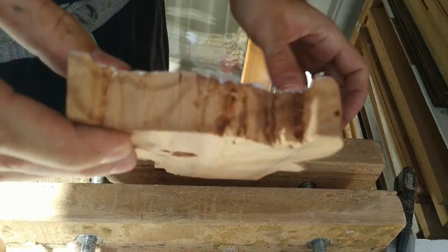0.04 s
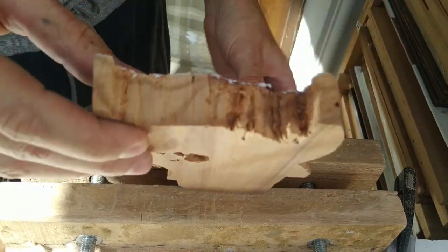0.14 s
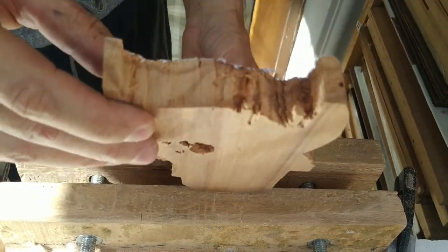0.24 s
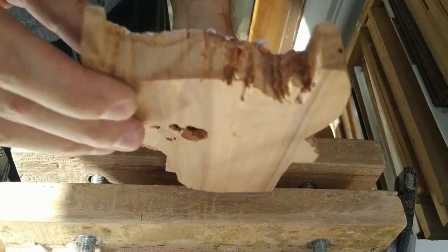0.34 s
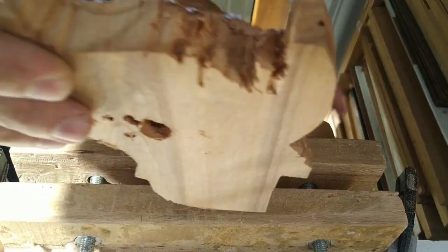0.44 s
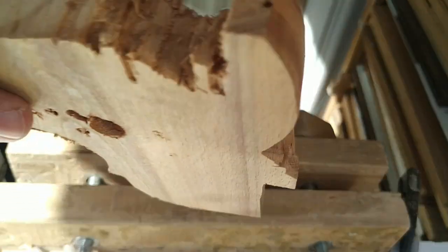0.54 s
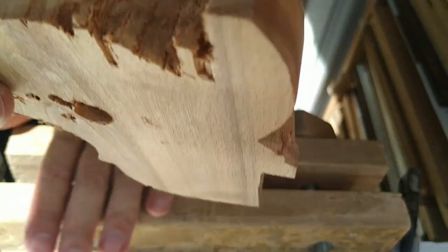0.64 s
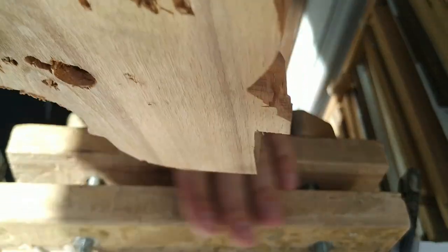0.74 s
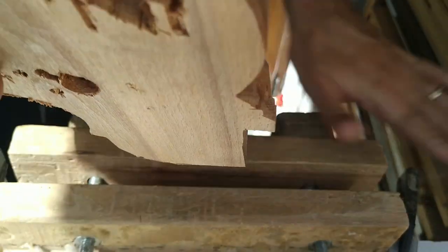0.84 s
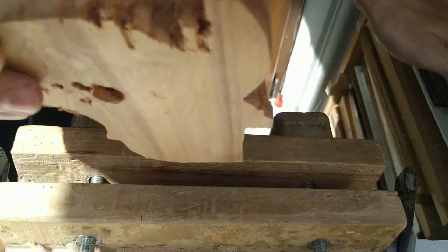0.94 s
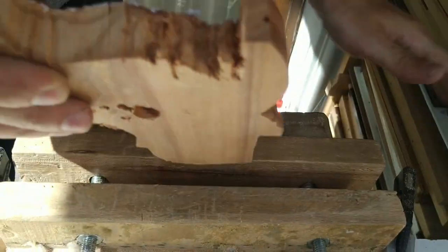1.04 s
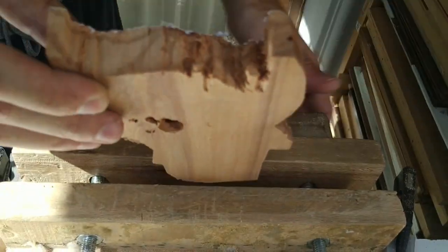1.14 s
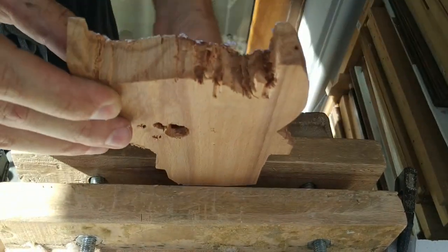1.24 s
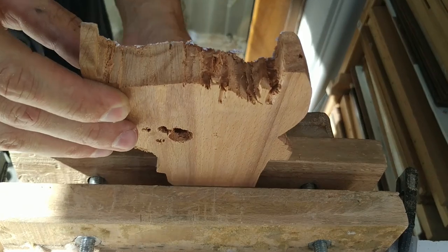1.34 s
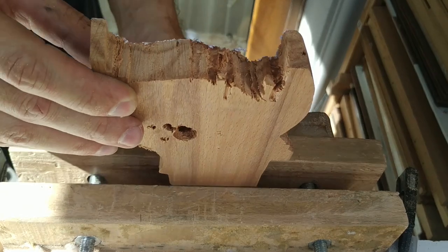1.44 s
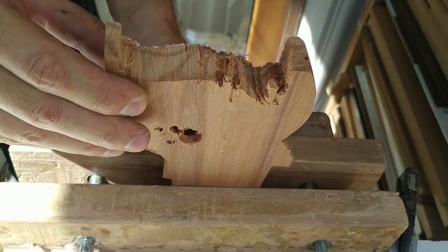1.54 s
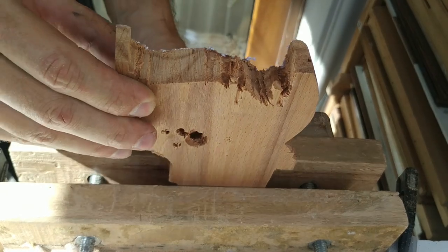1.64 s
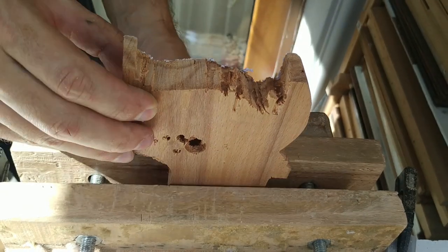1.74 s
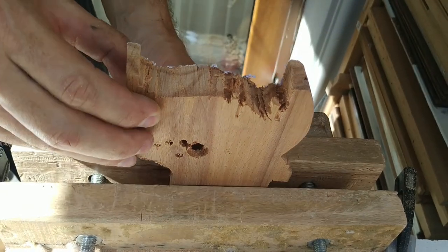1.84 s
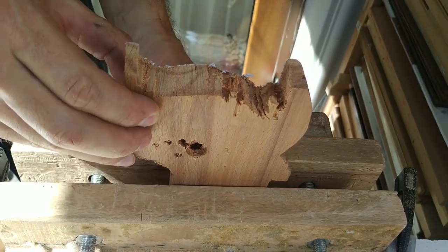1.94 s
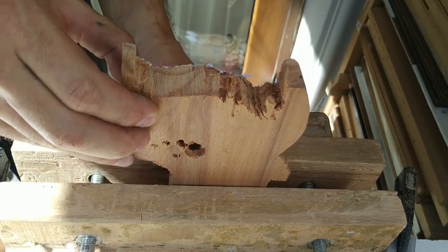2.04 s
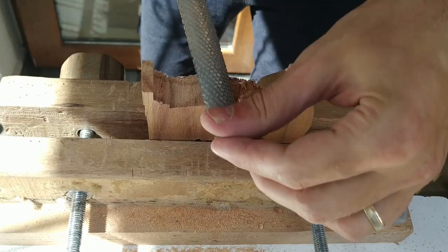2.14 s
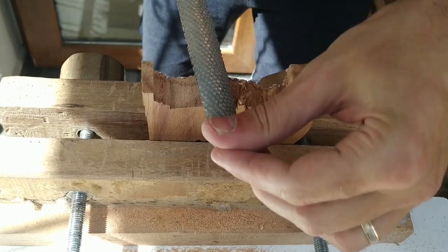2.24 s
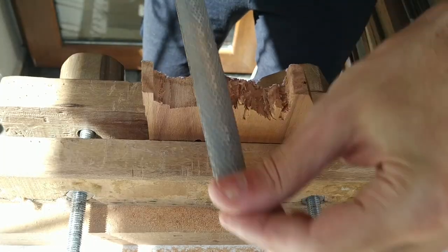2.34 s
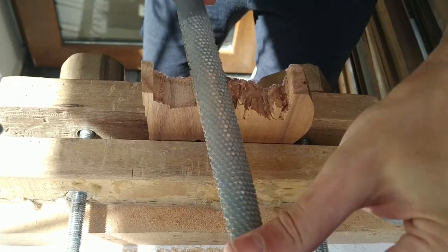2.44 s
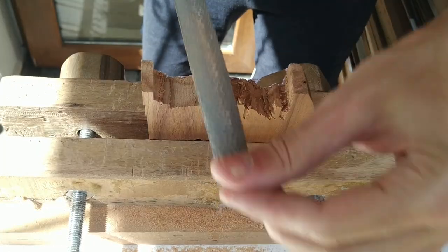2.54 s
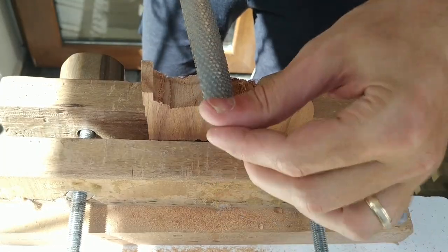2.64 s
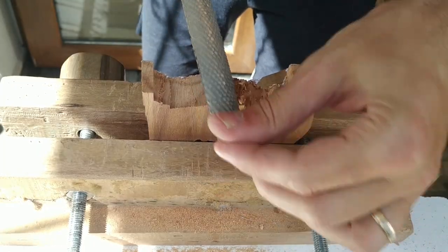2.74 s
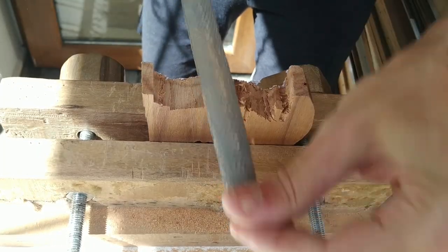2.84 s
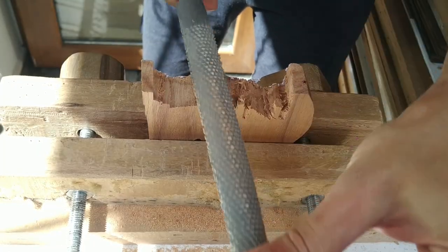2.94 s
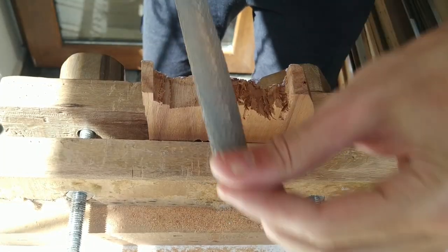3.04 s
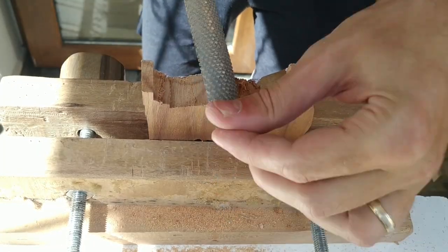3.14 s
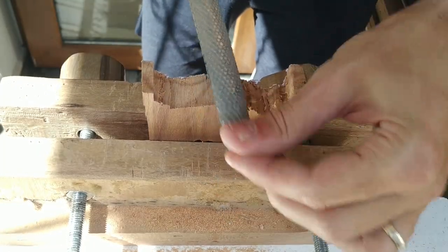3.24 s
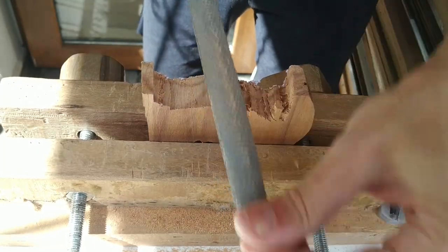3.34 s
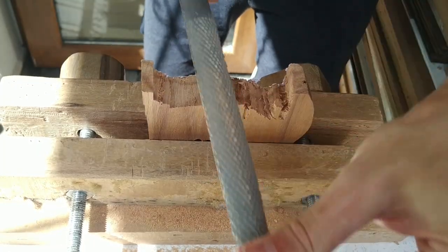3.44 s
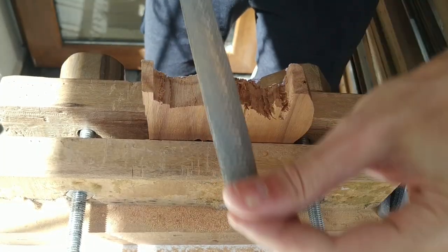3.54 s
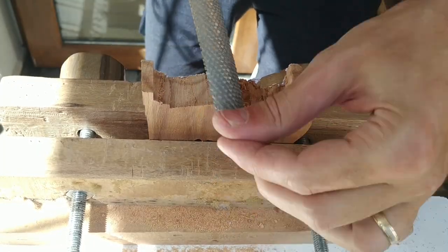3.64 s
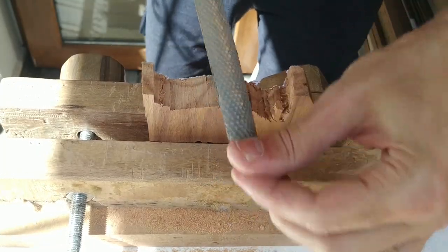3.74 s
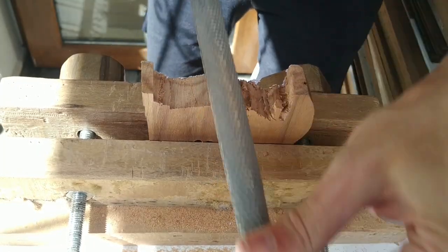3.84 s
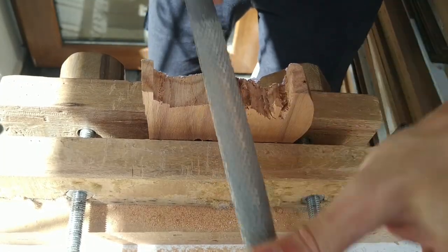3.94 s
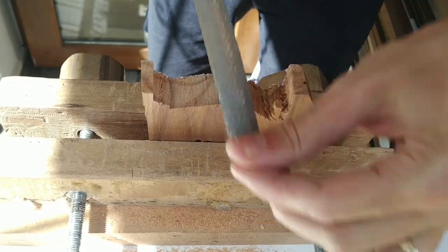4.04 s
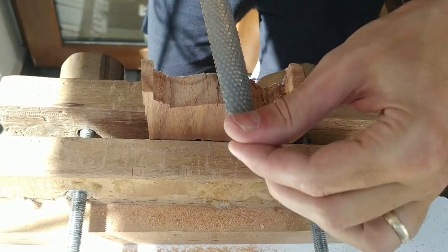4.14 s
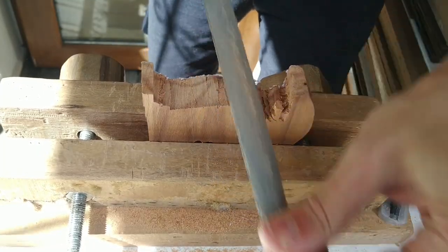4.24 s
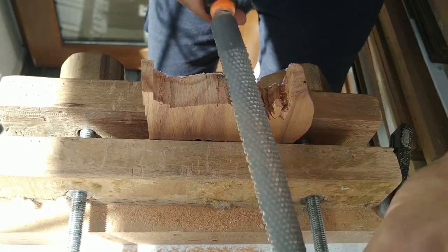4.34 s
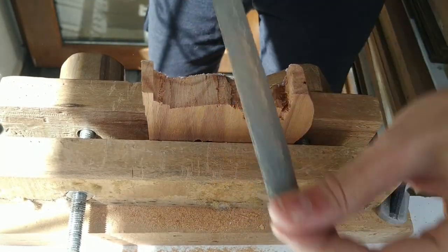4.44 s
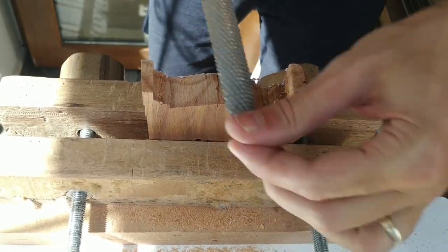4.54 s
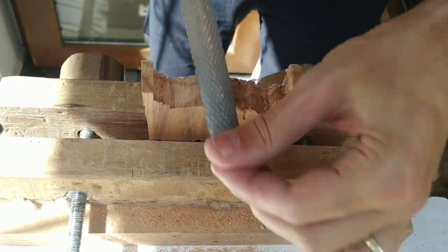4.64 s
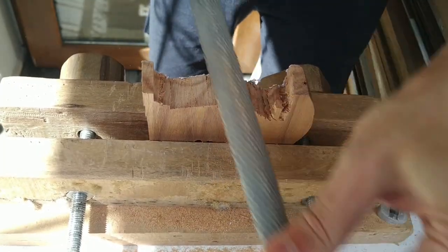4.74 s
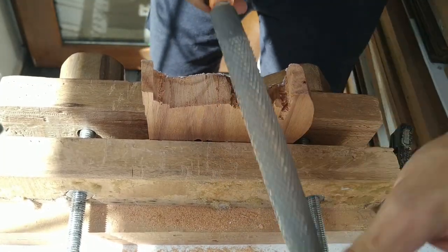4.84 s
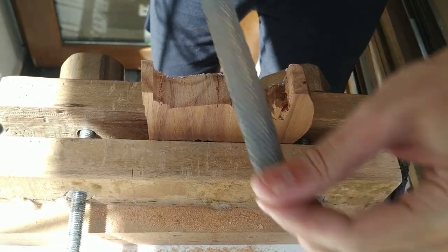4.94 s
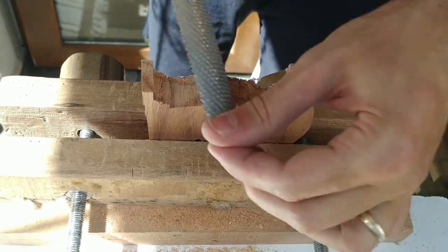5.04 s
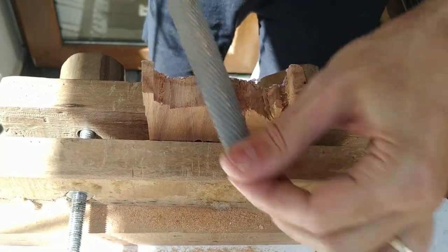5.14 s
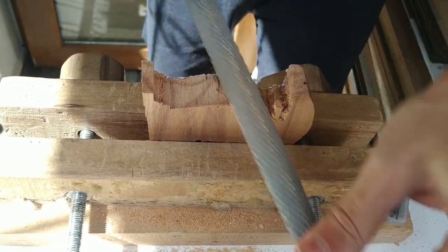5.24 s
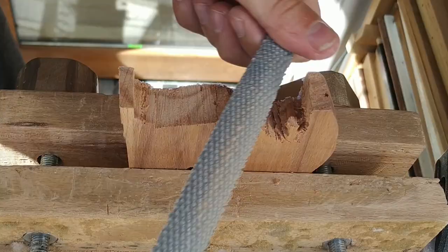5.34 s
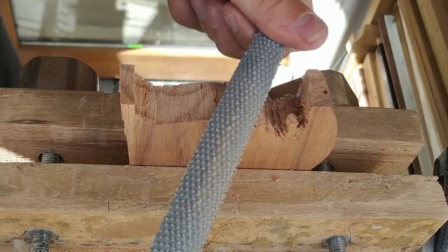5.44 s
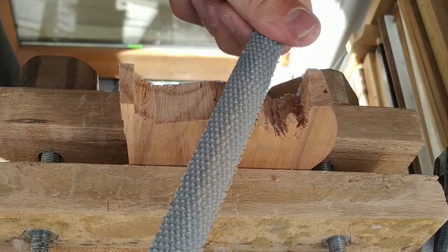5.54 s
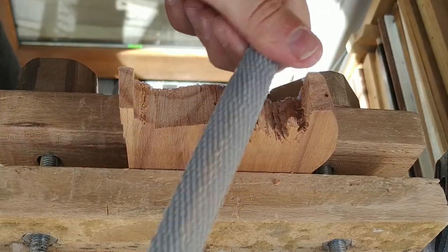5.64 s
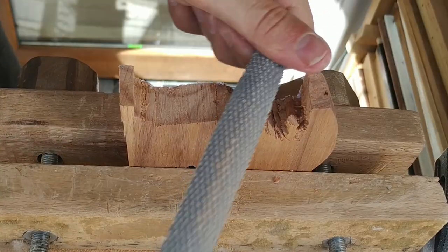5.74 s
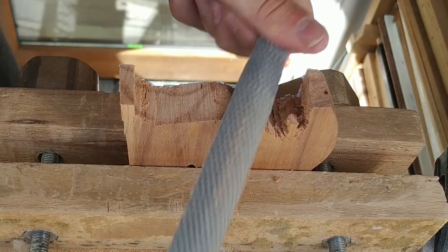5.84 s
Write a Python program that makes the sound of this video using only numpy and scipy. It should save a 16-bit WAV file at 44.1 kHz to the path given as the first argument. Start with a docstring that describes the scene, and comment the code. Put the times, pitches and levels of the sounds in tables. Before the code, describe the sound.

Soft wooden bumps and knocks as a blank is seated in a vise, then seven coarse, chattering file rasps and a few short scrapes outdoors.

```python
"""A coarse file rasps the edge of a wooden blank in a bench vise outdoors: seven pushes, then a few short scrapes.
Teeth that snag and release fibres excite resonances of wood and vise; in each push the blank chatters by stick-slip.
Ahead of each push the file slides lightly and its evenly spaced teeth hum; ringing modes die away as pushes end.
Before the filing the blank knocks, rubs and bumps into the vise and a palm sweeps over the jaw.
Short wall reflections and faint outdoor air lie behind.
"""
import sys
import numpy as np
from scipy import signal
from scipy.fft import rfft, irfft, next_fast_len
from scipy.io import wavfile
from scipy.ndimage import uniform_filter1d, minimum_filter1d, map_coordinates

SR = 44100
rng = np.random.default_rng(int(sys.argv[2]) if len(sys.argv) > 2 else 0)


def to_wav(s):
    """Save 16-bit WAV."""
    ch = np.atleast_2d(s).T  # columns
    pcm = np.round(np.clip(ch, -1, 1) * 32767)  # PCM
    wavfile.write(sys.argv[1], SR, pcm.astype(np.int16))


N = 259749

# spectral density of cut wood and of torn fibres: frequency [Hz], relative density [dB per Hz]
CUT_SPECTRUM = [(40, -20), (150, 2.5), (300, -9), (600, 1.5), (950, -1), (1400, 1), (1750, -4),
                (2200, -2.5), (2700, -0.5), (3600, -8.5), (4500, -13.5), (6000, -77)]
TEAR_SPECTRUM = [(100, -40), (600, -10), (2470, -9), (4200, -0.5), (4710, -7), (5440, -1), (5900, -6),
                 (8030, -5), (9160, -10.5), (10200, -9), (11600, -15), (12600, -13), (13700, -15),
                 (14700, -20.5), (15600, -46)]
# resonances of filed face, edge, blank, hollow low modes and vise: centre [Hz], bandwidth [Hz], relative level [dB]
FACE_MODES = [(1111, 56, -6), (1243.6, 18.6, 1), (1326, 15, 5), (1490, 76, -1.5), (1537, 23, -2),
              (1662, 84, -9.5)]
EDGE_MODES = [(1913, 117, 1), (1950, 38, 4), (2092, 102, -1.5), (2393, 22, -0.5), (2982, 28, -2.5),
              (3360, 94, -7.5), (3530, 29, -2)]
BLANK_MODES = [(637, 25.3, 0.5), (728, 18, -3), (782, 75, -13.5)]
HOLLOW_MODES = [(327, 26.6, -8), (455, 60, -9.5), (531.7, 28.6, -5.5)]
VISE_MODES = [(108.5, 17, -16.5), (131.5, 21, -3.5), (208.4, 11.3, -3), (237.6, 27.6, -11)]


def rasp():
    """Source and filter: snagging teeth are the force, and wood and vise resonances shape it."""
    rubbing, hissing = sliding(index=0), sliding(index=1)
    scrape = pressure(index=0, drop_db=29, rise_shape=2.0, fall_shape=1.9, lag_s=0.007975)
    bite = pressure(index=1, drop_db=32, rise_shape=1.95, fall_shape=2.0, lag_s=0.00099)
    tearing = pressure(index=2, drop_db=34.5, rise_shape=2.78, fall_shape=2.52, lag_s=-0.0045)
    ringing = pressure(index=3, drop_db=30.5, rise_shape=1.83, fall_shape=3.46, lag_s=-0.0049)
    hollowness = pressure(index=4, drop_db=34.5, rise_shape=1.64, fall_shape=2.4, lag_s=0.004)
    shuddering = pressure(index=5, drop_db=18.5, rise_shape=3.05, fall_shape=3.5, lag_s=-0.004)
    whine = pressure(index=3, drop_db=31.5, rise_shape=2.1, fall_shape=2.4, lag_s=0.0079)

    scrape_db = decibels(scrape + amp(-1) * rubbing)
    bite_db = decibels(bite + amp(-1) * rubbing)
    tear_db = decibels(tearing + hissing)
    ring_db = decibels(ringing + amp(-1) * rubbing)
    hollow_db = decibels(hollowness + amp(-1) * rubbing)
    shudder_db = decibels(shuddering + amp(4) * rubbing + jolts(width_s=0.022))
    whine_db = decibels(whine)
    cut_db = (scrape_db + bite_db) / 2

    swing, grip, lock = chatter(waver_hz=3.8, flutter_db=0.0, grip_depth=0.16)
    unevenness = amp(1.03 * wobble(130) + 1.17 * wobble(35))  # rows of teeth bite unevenly
    rows = unevenness * teeth(cut_db, top_rate_hz=590, depth=0.49)
    force = grip * rows * catches(rate_hz=1300, spread_db=-0.5, life_s=0.00041, bed=0.96)

    def fibres():
        return force * rng.standard_normal(N)

    cut = amp(cut_db + 0.5) * coloured(dense_modes(fibres(), t60_s=0.052), CUT_SPECTRUM)
    tear = amp(tear_db + 4.0) * coloured(dense_modes(fibres(), t60_s=0.044, dwell_s=0.1), TEAR_SPECTRUM)
    face = amp(scrape_db + 0.5) * rung(noise(force=force), FACE_MODES)
    edge = amp(bite_db + 0.5) * rung(noise(force=force), EDGE_MODES)
    ring = amp(ring_db - 0.5) * rung(noise(force=force), BLANK_MODES)
    hollow = amp(hollow_db - 1.5) * rung(noise(force=force), HOLLOW_MODES)
    shudder_db = shudder_db - 5 * lock  # strong chatter takes over from the vise's own modes
    shudder = amp(shudder_db - 2.5) * rung(noise(force=force), VISE_MODES)
    tones = singing([shudder_db, whine_db, scrape_db, bite_db], flutter_db=4.5)

    # the small blank radiates poorly in the deep bass, and wood damps the treble
    radiation = [(30, -3), (65, -2.5), (100, -3.0), (130, 0), (3800, -0.5), (9000, -1.5)]
    body = face + edge + ring + hollow + shudder + tones + swing
    body = filtered(body, lambda f: amp(along(radiation, f)))
    return cut + tear + body


# seven pushes, two short scrapes as the file is set down, and the start of one more push:
# start_s [s], rise_s [s], fall_s [s], then relative levels [dB]:
# scrape_db, bite_db, tear_db, ring_db, hollow_db, shudder_db
STROKES = [ (2.254, .15, 0.085, -31, -26.5, -36, -29, -34.5, -28.5),
           (2.724, .15, .12, -30, -28, -38, -22.5, -30.5, -29.5),
           (3.22, .14, .15, -30, -30, -40, -26, -24.5, -25.5),
           (3.686, 0.15, .16, -31, -30, -40, -23.5, -24.5, -24.5),
           (4.151, .13, .12, -29.5, -29, -37, -24.5, -31, -28.5),
           (4.623, .12, .14, -29.5, -27.5, -40, -24, -27.5, -26.5),
           (5.092, .13, 0.14, -30.5, -30, -38, -24.5, -27, -29),
           (5.417, 0.032, .12, -49, -42.5, -45, -49, -49, -38.5),
           (5.75, 0.052, 0.06, -46.5, -46.5, -50.5, -42.5, -45.5, -40.5),
           (5.826, 0.055, 0.087, -40, -37, -42, -43.5, -42, -34)]


def pressure(index, drop_db, rise_shape, fall_shape, lag_s):
    """Amplitude envelope: one layer's drive swells with every stroke to that stroke's level."""
    drive = 0
    for start, rise, fall, *levels in STROKES:
        movement = swell(start, rise + lag_s, fall, drop_db, rise_shape, fall_shape)
        drive = drive + amp(levels[index]) * movement
    return snags() * drive


# a row of teeth snags hard: start_s [s], leap_db [dB]
SNAGS = [(2.78, 3), (3.288, 5), (3.786, 5), (4.19, 7), (4.658, 5), (5.786, 6)]
SNAG_EASE_S = 0.02195  # time constant of the leap in dB


def snags():
    """Sudden catch and relaxation: the gain leaps at each snag, then its decibels decay exponentially."""
    start, leap_db = np.transpose(SNAGS)
    leaps = np.bincount(np.round(start * SR).astype(int), leap_db, N)
    return amp(signal.lfilter([1], [1, -np.exp(-1 / (SNAG_EASE_S * SR))], leaps))


def catches(rate_hz, spread_db, life_s, bed):
    """Random impulse train: teeth snag fibres and let go, over a bed of steady friction."""
    strength = amp(spread_db * np.clip(rng.standard_normal(N), -2, 2))
    impulses = (rng.random(N) < rate_hz / SR) * strength
    releases = signal.lfilter([1], [1, -np.exp(-1 / (life_s * SR))], impulses)
    return unit(bed + unit(releases))


def teeth(cut_db, top_rate_hz, depth):
    """Amplitude modulation: rows of teeth pass faster the harder the file is driven."""
    rate = top_rate_hz * amp((cut_db - cut_db.max()) / 4) * (1 + 0.04083 * wobble(40))
    return 1 + depth * np.cos(2 * np.pi * np.cumsum(rate) / SR)


def dense_modes(force, t60_s, dwell_s=0.09, size=2048):
    """High modal density: decaying noise answers cross-fade as contact travels, and differ between channels."""
    hop = round(dwell_s * SR)
    out = np.zeros((2, N + size))
    decay = amp(-60 * np.arange(size) / SR / t60_s)
    for centre in range(0, N + hop, hop):
        a, b = max(centre - hop, 0), min(centre + hop, N)
        share = np.cos(np.pi / 2 * (np.arange(a, b) - centre) / hop)
        answer = unit(noise(size) * decay)
        out[:, a:b + size - 1] += signal.fftconvolve((force[a:b] * share)[None], answer, axes=1)
    return out[:, :N]


# modes that lock onto the passing teeth:
# pitch_hz [Hz], waver_hz [Hz], level_db relative [dB], left_minus_right_db [dB]
LOCKED_MODES = [(134, 7.4, -2, -2), (637.5, 7.01, -3.5, -6), (1232, 14, -8, 8), (1996, 12.3, -6.5, 1.5)]


def singing(levels_db, flutter_db):
    """Mode locking: each mode holds an unsteady tone that follows its own drive."""
    out = np.zeros((2, N))
    for (hz, waver_hz, db, lean_db), level_db in zip(LOCKED_MODES, levels_db):
        phase = 2 * np.pi * np.cumsum(hz + waver_hz * wobble(50)) / SR
        tone = unit(amp(flutter_db * wobble(40)) * np.sin(phase))
        balance_db = np.array([[lean_db], [-lean_db]]) / 2
        out += amp(level_db + db + balance_db) * tone
    return out


# in each push the teeth catch, jolt the vise and set the blank chattering: start_s of the catch [s], length_s [s],
# pitch_hz [Hz], glide [Hz per s], chatter_db [dB], catch_jolt_db [dB], release_jolt_db [dB], levels relative
CHATTER = [ (2.29, .14, 180.6, -150, -27.5, -32, -31), (2.82, 0.092, 173.4, 8, -17.5, -16, -36),
           (3.318, .11, 174, -11.5, -14.5, -18, -22), (3.795, 0.11, 174.8, 15.5, -12, -23.5, -28),
           (4.228, 0.084, 172.2, 52, -24, -18, -29), (4.705, 0.1, 178.2, 2, -13.5, -30, -32),
           (5.18, 0.093, 172.5, 25.5, -13, -25.5, -32)]
CHATTER_LEAD_S, CHATTER_BUILD_S = 0.024, 0.06  # it starts just before the catch and builds
RING_DOWN_DB_PER_S = 251


def chatter(waver_hz, flutter_db, grip_depth):
    """Stick-slip at the blank's bending pitch: returns its swing, the grip on the teeth and its strength 0-1."""
    t = np.arange(N) / SR
    level, pitch = np.zeros(N), np.full(N, float(CHATTER[0][2]))
    for start, length, hz, glide, db, *_ in CHATTER:
        progress = np.clip((t - start + CHATTER_LEAD_S) / CHATTER_BUILD_S, 0, 1)
        build = np.sin(np.pi / 2 * progress) ** 2
        level += build * amp(db - RING_DOWN_DB_PER_S * np.maximum(t - start - length, 0))
        gliding = hz + glide * np.clip(t - start, 0, length)
        pitch = np.where(t > start - CHATTER_LEAD_S, gliding, pitch)
    phase = 2 * np.pi * np.cumsum(pitch + waver_hz * wobble(45)) / SR
    swing = np.sqrt(2) * level * amp(flutter_db * wobble(50)) * np.sin(phase)
    lock = level / level.max()
    grip = 1 + grip_depth * np.sqrt(lock) * np.cos(phase)
    return swing, grip, lock


def jolts(width_s):
    """Impulsive excitation: the vise jerks as the teeth catch and again as they let go."""
    t = np.arange(N) / SR

    def jerk(moment):
        return np.exp(-((t - moment) / width_s) ** 2)

    drive = 0
    for start, length, *_, catch_db, release_db in CHATTER:
        drive = drive + amp(catch_db) * jerk(start) + amp(release_db) * jerk(start + length)
    return drive


# the file slides lightly ahead of each push: start_s [s], end_s [s], rub_db [dB], hiss_db [dB],
# pitch_hz of the passing teeth [Hz], hum_db [dB], overtone slope [dB per octave], levels relative
SLIDES = [(2.15, 2.313, -56, -59, 130, -43.5, -13.5), (2.47, 2.771, -56, -60.5, 97.7, -43, -12.5),
          (2.959, 3.25, -51, -51, 246.4, -51, -5), (3.484, 3.719, -60, -66, 99, -53.5, -6.5),
          (3.977, 4.179, -61, -62, 183, -50.5, -15), (4.385, 4.639, -60, -64, 102, -75, -8),
          (4.867, 5.109, -64, -74, 102, -64, -6)]


def returns(waver, count=6):
    """Periodic excitation: sliding without pressure, evenly spaced teeth hum as a harmonic series."""
    hum = np.zeros(N)
    travel = np.cumsum(1 + waver * wobble(24.86)) / SR
    for start, end, *_, pitch_hz, db, overtone_db in SLIDES:
        touch = held(start, end, fade_s=0.027)
        on = touch > 0
        tone = 0
        for k in range(1, count + 1):
            tone = tone + amp(overtone_db * np.log2(k)) * np.sin(2 * np.pi * k * pitch_hz * travel[on])
        hum[on] += touch[on] * amp(db) * tone
    return np.sqrt(2) * hum * amp(1.9 * wobble(40))


def sliding(index):
    """Steady friction: faint, even drive of the rubbing or the hiss while the file slides."""
    return sum(amp(levels[index]) * held(start, end, fade_s=0.02007) for start, end, *levels in SLIDES)


# file and blank ring on as a push ends, at pitches set by the grip:
# start_s [s], pitch_hz [Hz], level_db relative [dB], t60_s [s]
RINGING = [(3.4, 543, -43, 0.45), (3.399, 1563, -58.5, 1.4), (3.92, 461.6, -57, 1), (3.92, 1080, -55, 0.5),
           (4.32, 722, -55, 1.3), (4.32, 1115, -43, 0.37), (4.321, 2516, -66, 1.4), (4.8, 1368, -53.5, 1.2),
           (5.24, 654, -30, 0.19), (5.249, 1233, -40, 0.34), (5.279, 1323, -42, 0.4)]


def steel(swell_s, beat_db):
    """Free vibration: lightly damped modes of file and blank swell, then decay exponentially."""
    t = np.arange(SR) / SR
    out = np.zeros((2, N + SR))
    for start, hz, db, t60 in RINGING:
        phases = rng.uniform(0, np.pi / 2, (2, 1))
        envelope = amp(db + 5.5 - 60 * t / t60) * (1 - np.exp(-t / swell_s))
        out[:, round(start * SR):][:, :SR] += envelope * np.sin(2 * np.pi * hz * t + phases)
    return out[:, :N] * amp(beat_db * wobble(27))


# resonances of the vise's thump and the blank's clack: centre [Hz], bandwidth [Hz], relative level [dB]
THUMP_MODES = [(121, 24, -1), (186, 14, 6.5), (239, 34, -2.5)]
CLACK_MODES = [(320, 52, 2), (443, 190, -1), (601, 36.3, 9), (743, 124, -10)]
# spectral density of the surface tick: frequency [Hz], relative density [dB per Hz]
TICK_SPECTRUM = [(600, -37), (1100, 1), (1550, 12.5), (2100, -2), (3500, -7), (5500, -10), (9000, -8.5),
                 (12500, -7), (15000, -18)]
# the blank and the file knock on the vise:
# start_s [s], level_db [dB], thump_db [dB], clack_db [dB], tick_db [dB], levels relative
KNOCKS = [(0.204, -48, -17, -12, -14), (0.412, -30.5, -9.5, -13, -12), (0.671, -31, -9, -17, -15),
          (1.307, -30.5, -12, -9.5, -39), (1.331, -34.5, -8, -12, -33), (1.377, -33, -3.5, -7, -36),
          (1.436, -24.5, -10, -6, -9), (1.456, -25.5, 0, -28, -22), (1.606, -37.5, -6.5, -7.5, -21),
          (4.168, -27, -22, -24, -3), (5.441, -22.5, 3.5, -42, -22), (5.466, -21.5, -8, -18, -30.5),
          (5.789, -12.5, -6, -22.5, -39), (5.872, -16.5, -2, -24, -17)]


def knocks(contact_t60_s, tick_t60_s, push_s):
    """Impact response: each knock thumps the vise, clacks the blank and scuffs the surface."""
    size = SR // 2
    t = np.arange(size) / SR
    out = np.zeros((2, N + size))

    def peaked(x):
        return x / np.abs(x).max()

    push = (1 - t / push_s) * np.exp(-t / push_s)  # press and rebound
    for start, db, thump_db, clack_db, tick_db in KNOCKS:
        thump = amp(thump_db) * peaked(rung(push, THUMP_MODES))
        clack = rung(noise(size), CLACK_MODES) * amp(-60 * t / contact_t60_s)
        clack = amp(clack_db + 6.5) * peaked(clack)
        tick = coloured(noise(size), TICK_SPECTRUM) * amp(-60 * t / tick_t60_s)
        tick = amp(tick_db + 2.5) * peaked(tick)
        out[:, round(start * SR):][:, :size] += amp(db) * (thump + clack + tick)
    return out[:, :N]


# spectral density of palm, rub and bump: frequency [Hz], relative density [dB per Hz]
PALM_SPECTRUM = [(300, -6.5), (550, -6), (950, -13.5), (1500, -9), (2400, -4), (5500, -7.5), (8200, -5.5),
                 (12000, -9.5), (15600, -11.5)]
RUB_SPECTRUM = [(250, -35), (450, -9), (1500, -6.5), (2800, -8.5), (3900, -2), (5600, -13.5), (7200, -11.5),
                (9000, -22), (15000, -22)]
BUMP_SPECTRUM = [(20, -31), (45, -3), (90, 0.5), (135, 8.5), (200, 2), (280, -10.5), (450, -51.5)]
# palm sweeps and rubs of the blank: start_s [s], rise_s [s], fall_s [s], level_db relative [dB]
SWEEPS = [(0.52, 0.087, 0.14, -47), (0.68, 0.13, 0.14, -37.5)]
RUBS = [(1.2, 0.17, .2, -71), (1.42, 0.018, 0.052, -64), (1.49, 0.057, 0.16, -64.5),
        (1.71, 0.054, 0.084, -59), (1.83, 0.03, .06, -65), (1.88, .15, .3, -74)]
# bumps of the blank: start_s [s], level_db relative [dB]
BUMPS = [(0.09, -58.5), (0.205, -52.5), (0.415, -46.5), (0.67, -46), (0.76, -67), (0.85, -46.5),
         (0.91, -58), (1.22, -64), (1.45, -41.5), (1.5, -66), (1.704, -56), (1.767, -56), (1.88, -62),
         (1.945, -55.5), (2.02, -63)]
BUMP_RISE_S, BUMP_FALL_S = 0.023, 0.055


def handling():
    """Friction noise: a palm sweeps over the jaw; the blank rubs and bumps as it is seated."""
    def moves(table):
        return sum(amp(db) * swell(start, rise, fall, drop_db=31.5, rise_shape=2.36, fall_shape=3.0)
                   for start, rise, fall, db in table)

    bumping = sum(amp(db) * swell(start, BUMP_RISE_S, BUMP_FALL_S, drop_db=10.5, rise_shape=3.3, fall_shape=2.1)
                  for start, db in BUMPS)
    grit = catches(rate_hz=1100, spread_db=6, life_s=0.00066, bed=6.0)
    sweep = amp(1.0 + 1.4 * wobble(60.7)) * moves(SWEEPS) * coloured(noise(force=grit), PALM_SPECTRUM)
    rub = amp(5.0 + 2.5 * wobble(80)) * moves(RUBS) * coloured(noise(force=grit), RUB_SPECTRUM)
    return sweep + rub + bumping * coloured(noise(), BUMP_SPECTRUM)


# dry wood squeaks under the fingers: start_s [s], pitch_hz [Hz], level_db [dB], length_s to 1/e either side [s]
SQUEAKS = [(0.213, 3480, -51, 0.0072), (1.323, 3520, -58, .015)]


def squeaks(waver):
    """Stick-slip friction: brief tones of wavering pitch under a bell-shaped envelope."""
    t = np.arange(N) / SR
    warp = np.cumsum(1 + waver * wobble(400)) / SR
    return sum(amp(db) * np.exp(-((t - start) / length) ** 2) * np.sin(2 * np.pi * hz * warp)
               for start, hz, db, length in SQUEAKS)


# decay of the reflections: frequency [Hz], t60_s [s]
WALL_DECAY = [(150, 0.23), (700, 0.095), (2000, 0.081), (5000, 0.27), (14000, 0.12)]


def walls(x):
    """Reverberation: the house wall and the bench answer with a short tail whose decay depends on frequency."""
    hz, _, z = signal.stft(rng.standard_normal((2, SR // 2)), SR, nperseg=256)
    t = _
    decay = amp(-60 * t / along(WALL_DECAY, hz)[:, None])
    tail = signal.istft(z * decay, SR, nperseg=256)[1]
    delayed = np.pad(tail, ((0, 0), (200, 0))) / np.linalg.norm(tail[0])  # delay in samples
    wet = signal.fftconvolve(x, delayed, axes=1)[:, :N]
    return filtered(wet, lambda f: amp(along([(170, -7.5), (600, 2)], f)))


# spectral density of the air: frequency [Hz], relative density [dB per Hz]
AIR_SPECTRUM = [(18, -48), (30, -5), (148, -12), (173, -12.5), (219, -43), (316, -50), (433, 1),
                (624, -0.5), (855, -5), (2030, -6), (3000, -11.5), (4330, -15), (5620, -21.5), (15600, -28)]
AIR_DB = -59.5  # centre of a slowly drifting level


def air():
    """Broadband ambient noise: a faint outdoor background."""
    return amp(AIR_DB + 1.26 * wobble(2.31)) * coloured(noise(), AIR_SPECTRUM)


# likeness of the two channels: frequency [Hz], correlation [-1 to 1]
CHANNEL_LIKENESS = [(150, 0.84), (350, 1), (700, 0.33), (1300, 0), (2200, 0.16), (4000, -0.2), (8000, 0)]


def noise(size=N, force=1):
    """Interchannel coherence: driven stereo noise, alike in the bass and unrelated in the treble."""
    def mid_side(f):
        turn = np.arccos(np.clip(along(CHANNEL_LIKENESS, f), -1, 1)) / 2
        return np.array([np.cos(turn), np.sin(turn)])

    mid, side = filtered(force * rng.standard_normal((2, size)), mid_side)
    return np.array([mid + side, mid - side])


def swell(start, rise, fall, drop_db, rise_shape, fall_shape, touch_s=0.01191):
    """Movement envelope: contact, a climb of drop_db to a rounded crest, and an easing off."""
    gain = np.zeros(N)
    span = np.arange(round(start * SR), min(N, round((start + rise + 2 * fall) * SR)))
    t = span / SR - start
    climbing = np.abs((rise - t) / rise) ** rise_shape
    easing = np.abs((t - rise) / fall) ** fall_shape
    away = np.where(t < rise, climbing, easing)
    gain[span] = np.clip(t / touch_s, 0, 1) * amp(-drop_db * away)
    return gain


def held(start, end, fade_s):
    """Steady contact: even gain from start to end with linear fades."""
    t = np.arange(N) / SR
    return np.clip(np.minimum(t - start, end - t) / fade_s, 0, 1)


def rung(x, modes):
    """Modal superposition: x through resonances of alternating sign, at rms 1."""
    def response(f):
        total = 0
        for k, (centre, width, db) in enumerate(modes):
            resonance = 1j * f * width / (centre * centre - f * f + 1j * f * width)
            total = total + (-1) ** k * amp(db) * resonance
        return total

    return unit(filtered(x, response))


def coloured(x, spectrum):
    """Spectral shaping: x weighted by the given spectrum, at rms 1."""
    return unit(filtered(x, lambda f: amp(along(spectrum, f))))


def filtered(x, response):
    """Linear filtering: x times a complex response of frequency."""
    m = next_fast_len(x.shape[-1] + SR // 2)
    spectrum = rfft(x, m) * response(np.fft.rfftfreq(m, 1 / SR))
    return irfft(spectrum, m)[..., :x.shape[-1]]


def wobble(rate):
    """Slow random modulation: a smooth curve with rate knots a second."""
    knots = rng.standard_normal(int(N * rate / SR) + 4)
    return map_coordinates(knots, [np.arange(N) * rate / SR])


def along(points, hz):
    """Logarithmic frequency scale: interpolates (Hz, value) points."""
    f, v = np.transpose(points)
    return np.interp(np.log(hz + 1), np.log(f + 1), v)


def amp(db):
    """Level to amplitude ratio."""
    return 10 ** (np.asarray(db) / 20)


def decibels(gain):
    """Amplitude ratio to level, with a floor."""
    return 20 * np.log10(gain + 1e-6)


def unit(x):
    """Power normalization: x at rms 1."""
    return x / np.sqrt(np.mean(x ** 2) + 1e-20)


# the file is off the wood and its ringing is choked: start_s [s], end_s [s]
LIFTED = (5.382, 5.43)
# stereo balance: frequency [Hz], left_minus_right_db [dB]
STEREO_LEAN = [(60, -8), (110, 0), (200, -1), (380, -3.5), (700, -0.5), (1290, -2), (2380, -1), (4400, -4),
               (8120, -0.5), (15000, 1)]


def scene():
    """Superposition: filing and handling, their reflections, and the air."""
    on_wood = 1 - held(*LIFTED, fade_s=0.009)
    filing = on_wood * (rasp() + returns(waver=0.01395) + steel(swell_s=0.023, beat_db=4))
    knocking = knocks(contact_t60_s=0.16, tick_t60_s=0.15, push_s=0.00095)
    work = filing + knocking + handling() + squeaks(waver=0.025)
    work = filtered(work, lambda f: amp(np.outer([1, -1], along(STEREO_LEAN, f)) / 2))
    return work + amp(-13.0) * walls(work) + air()


TOP_HZ = 15780


def record(dry, size=500):
    """Peak limiting and band limiting: holds down the loudest peaks, then removes all from TOP_HZ up."""
    ceiling = 0.53
    needed = np.minimum(1, ceiling / (np.abs(dry).max(axis=0) + 1e-9))
    gain = uniform_filter1d(minimum_filter1d(needed, size), size)
    return filtered(dry * gain, lambda f: f < TOP_HZ)


dry = scene()
out = record(dry)
to_wav(out)
```